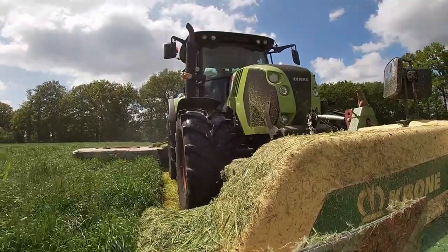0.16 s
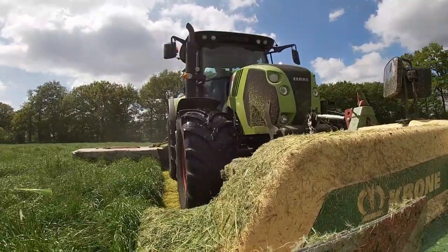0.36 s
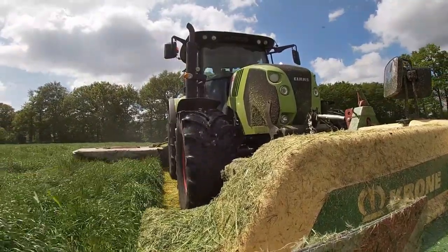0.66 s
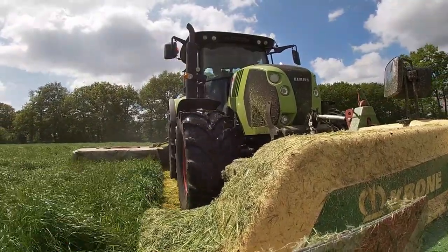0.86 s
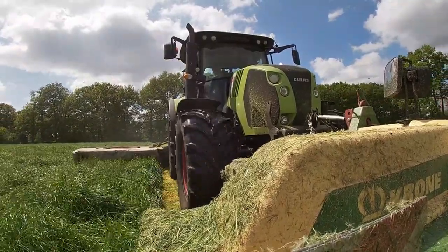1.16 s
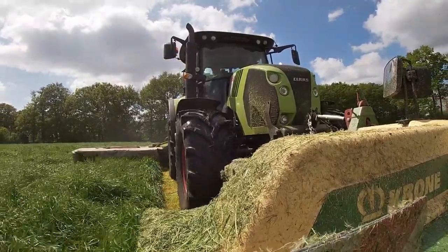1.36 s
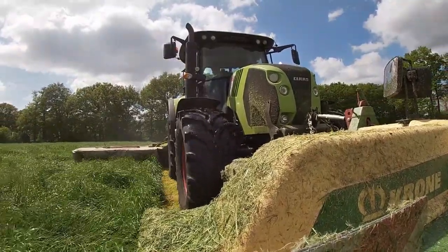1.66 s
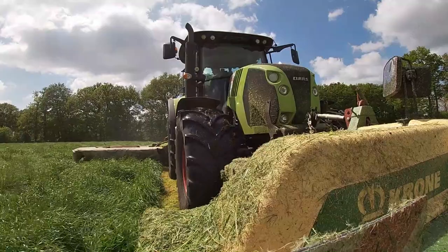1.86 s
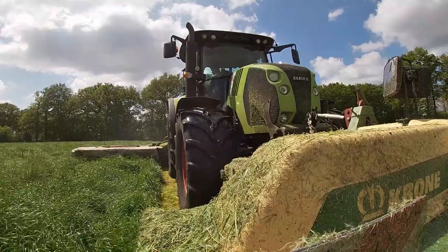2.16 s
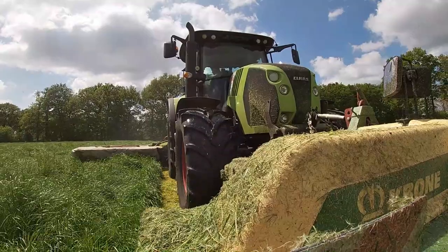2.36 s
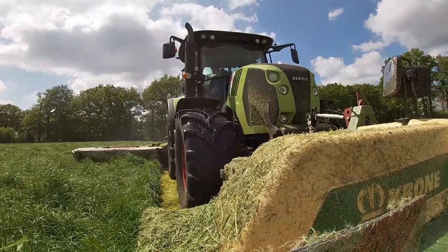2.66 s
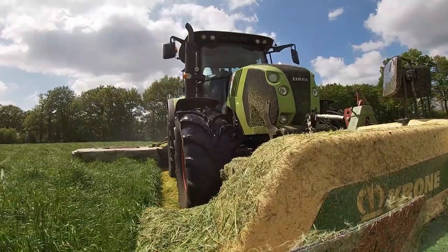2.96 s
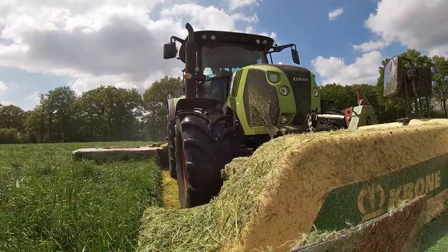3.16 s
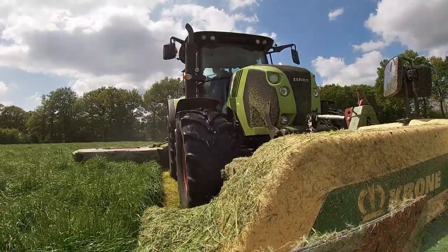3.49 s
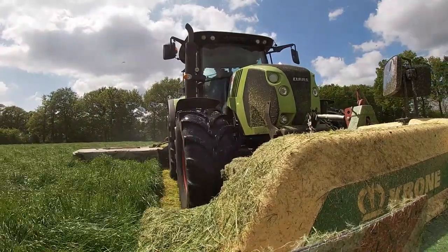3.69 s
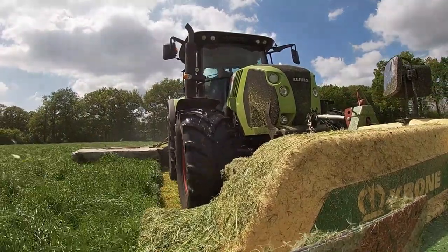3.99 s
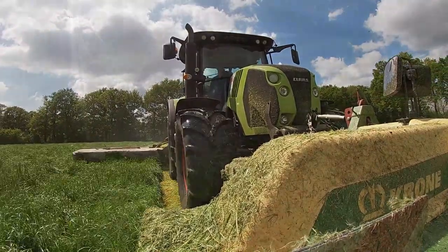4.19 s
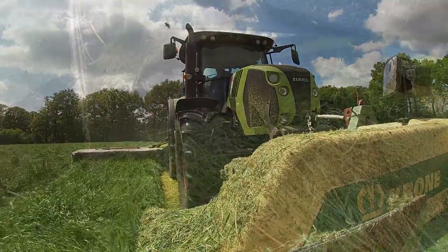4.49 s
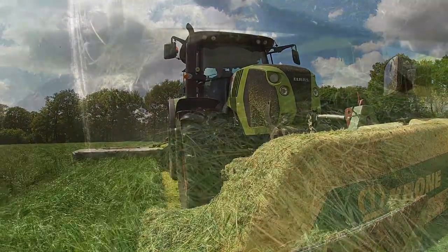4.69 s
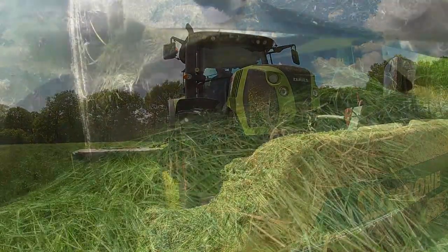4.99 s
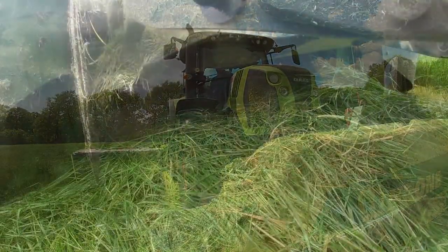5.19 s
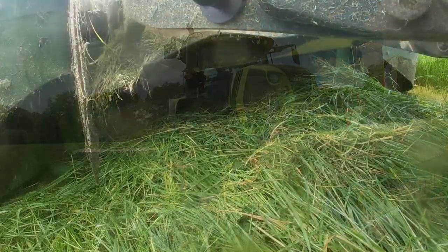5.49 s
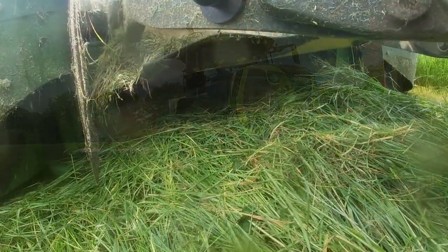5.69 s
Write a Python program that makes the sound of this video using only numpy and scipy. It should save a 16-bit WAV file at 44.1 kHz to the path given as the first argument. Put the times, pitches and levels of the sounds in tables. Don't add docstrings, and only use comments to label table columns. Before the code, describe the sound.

A loud rough mower hum near 104 hertz with a dense rush of torn grass, dissolving into slower rhythmic rustling sweeps of grass.

```python
import sys
import numpy as np
from scipy import signal
from scipy.fft import rfft, irfft, next_fast_len
from scipy.io import wavfile
from scipy.ndimage import uniform_filter1d

SR = 44100
rng = np.random.default_rng(int(sys.argv[2]) if len(sys.argv) > 2 else 0)


def level_to_linear(level):
    exponent = np.asarray(level, float) / 20
    return 10 ** exponent


def waveform_to_disk(signal):
    frames = np.transpose(np.atleast_2d(signal))
    scaled = np.clip(frames, -1, 1) * 32767
    samples = np.round(scaled).astype(np.int16)
    wavfile.write(sys.argv[1], SR, samples)


N = 257544
T = np.arange(N) / SR

# t/s, rate/Hz
BLADE_RATE = [(0.0, 104.41), (0.3, 104.25), (0.6, 103.79), (0.9, 103.62), (1.2, 104.07), (1.5, 103.66),
              (1.8, 104.21), (2.1, 104.11), (2.4, 104.28), (2.7, 103.81), (3.0, 103.96), (3.3, 104.3),
              (3.6, 104.86), (3.9, 104.32), (4.2, 104.43), (4.5, 103.45), (4.8, 103.41), (5.1, 104.44)]
DISC, REAR, GEAR, CRANK, FAN = 1 / 2, .48534, .48187, .32673, .60865
# multiple of its turning rate, level/dB
DISC_TONES = [(1, -44), (4, -34), (6, -39.5), (7, -44), (8, -37.5), (12, -41.5), (14, -41.5), (16, -48),
              (20, -42.5), (21, -46.5), (22, -46), (28, -54), (30, -48.5), (31, -48), (32, -49),
              (40, -51.5), (42, -45)]
REAR_TONES = [(6, -44), (8, -45)]
GEAR_TONES = [(6, -30), (12, -30), (13, -52), (18, -41), (19, -44), (24, -45.5), (25, -53), (27, -50.5),
              (29, -61), (30, -40), (38, -48), (76, -52)]
CRANK_TONES = [(1, -52), (4, -35.5)]
FAN_TONES = [(2, -37.5), (3, -34), (4, -38.5), (7, -45)]
# t/s, mower level/dB, rotor level/dB
DISSOLVE = [(4.1, -1, -41.5), (4.4, -2, -21), (4.8, -3.5, -12.5), (5.2, -8.5, -5), (5.5, -14, -3),
            (5.7, -17, -1.5), (5.84, -37, -0.5)]
# f/Hz, level/dB
ROAR = [(20, -15.5), (45, -13), (88, -3.5), (104, -7), (130, -4.5), (205, -10.5), (240, -11.5),
        (357, -14.5), (480, -14), (520, -13), (669, -15), (1300, -29.5), (1690, -52), (2860, -120)]
# f/Hz, level/dB
RUSH = [(530, -34), (900, -4.5), (995, -10), (1180, -5.5), (1300, -9.5), (1550, -6.5), (1780, -6),
        (2110, -6.5), (2290, -7.5), (3100, -7.5), (4110, -13), (5800, -14.5), (16000, -19)]
# f/Hz, share
LOAD_SHARE = [(4500, 1), (7500, 0)]
# f/Hz, width/Hz, level/dB
PANELS = [(222.7, 18, -37), (307, 25, -38), (513, 44, -37.5), (594.5, 21, -39), (1584, 180, -39.5),
          (2140, 100, -46.5), (3780, 45, -51.5), (4930, 90, -50.5)]
# f/Hz, level/dB
SWEEP = [(20, -14), (86, -2.5), (169, -2), (368, -15), (470, -2.5), (613, -11), (763, -4), (949, -11.5),
         (2830, -17.5), (4000, -26), (6000, -31), (9500, -29), (11000, -36), (16000, -37)]
# f/Hz, width/Hz, lift/dB
HOUSING = [(495, 84, 4), (750, 50, -1), (858, 34, 5.5), (1079, 71, 8), (1630, 46, 6), (1835, 50, 5),
           (2143, 45, 6), (2790, 55, 6), (3680, 40, 8)]
# strength/dB, fall time/share of a stroke
ARMS = [(1.2, 0.33), (-0.3, 0.3), (-.6, 0.22), (-.8, 0.22)]
# f/Hz, depth
STROKE_DEPTH = [(100, .15), (600, 0.2), (2000, 0.55), (4500, 1.05), (9000, 1.2)]
# f/Hz, share
REPEAT = [(100, .55), (900, .6), (2000, .55), (5000, .35)]
# f/Hz, level/dB
ROTOR_TONES = [(80.1, -28), (100.8, -39), (160.2, -42), (201.6, -29.5), (302.5, -48), (604.7, -38)]
# f/Hz, level/dB
MICROPHONE = [(6000, 0), (6400, -10), (7000, -19.5), (7500, -21.5), (9100, -18), (9700, -21.5),
              (11000, -21), (12000, -32), (13500, -33), (14300, -50)]
# t/s, change/dB, length/s
FRONT_SWELLS = [(.55, -5, .08), (.815, -8.5, 0.17), (1.05, -1.5, .3), (1.78, -3, 0.045), (2.15, -6, 0.11),
                (2.41, -7, .07), (2.75, 2.5, .2), (3.09, -8, 0.077), (3.2, 2, .1), (3.34, -9, .1),
                (3.62, 1.5, .15), (3.98, 3, .3), (4.21, -6, .12), (4.67, -3, .1), (5.1, -4, .35), (5.4, -5, .2)]
# t/s, change/dB, length/s
REAR_SWELLS = [(.33, 10, .12), (.52, 7, .08), (.68, 13, 0.081), (.82, 9, 0.11), (.98, 11, 0.14), (1.4, 8.5, .3),
               (1.76, 6, .08), (1.95, 9, .2), (2.17, 8.5, .2), (2.48, 9, .2), (2.86, 15, 0.16), (3.08, 7.5, 0.2),
               (3.65, 10, 0.46), (4.22, 7, 0.18), (4.54, 9, .1), (4.98, 13, 0.47)]
# t/s, change/dB
BUMPS = [(.06, 12), (.25, 16), (.36, 13.5), (.53, 19), (.62, 12), (.92, 15), (1.1, 12), (1.43, 8),
         (1.56, 18), (1.95, 15), (2.16, 16), (2.41, 12), (2.7, 10), (2.93, 5), (3.09, 11), (3.37, 14),
         (3.47, 12), (3.57, 13), (3.7, 9), (3.82, 14), (4.05, 7), (4.25, 14), (4.47, 13), (4.57, 12),
         (4.68, 17), (5.1, 17)]
# t/s, change/dB, length/s
STRAIN = [
    (1.01, 4, 0.22),
    (1.42, 5, .25),
    (1.61, -6, .08),
    (1.93, 1, .2),
    (2.2, -1.5, .3),
    (2.62, -2, .1),
    (2.78, 1.5, .2),
    (3.6, -4, 0.18),
    (4.7, -3.5, 0.81),
]
# t/s, change/dB, length/s
CLUMPS = [(.1, 0.5, .12), (.91, 2.5, 0.088), (1.07, 3, 0.2), (1.25, 1.5, 0.24), (1.62, 1.5, .25),
          (2.05, 3, 0.39), (2.21, 4, 0.12), (2.34, 2, 0.1), (2.55, 1.5, .3), (2.87, 1.5, .2),
          (3.1, 1, 0.22), (3.36, 3, 0.47), (3.87, 2, .2), (4.4, 0, 0.25)]
# t/s, change/dB, length/s
GUSTS = [
    (.05, 1.5, .2),
    (.98, 2, .4),
    (1.35, -1, .2),
    (2.2, -1.5, .12),
    (4.4, 1, .5),
]


def evened(x):
    return x / np.sqrt(np.mean(x ** 2) + 1e-20)


def read(points, hz):
    f, value = np.transpose(points)
    return np.interp(np.log(hz + 1), np.log(f + 1), value)


def curves(rows):
    s, *columns = np.transpose(rows)
    return [np.interp(T, s, column) for column in columns]


def swells(rows):
    return sum(db * np.exp(-2 * (2 * (T - s) / length) ** 2) for s, db, length in rows)


def colour(x, gain):
    size = next_fast_len(N)
    return irfft(rfft(x, size) * gain(np.fft.rfftfreq(size, 1 / SR)), size)[:N]


def noise_through(x, spectrum):
    return colour(x, lambda f: level_to_linear(read(spectrum, f)))


def bell(f, hz, width_hz):
    return 1 / (1 + (2 * (f - hz) / width_hz) ** 2)


def ringing(hz, width_hz):
    return evened(colour(rng.standard_normal(N), lambda f: bell(f, hz, width_hz)))


def drift(rate_hz):
    coarse = np.arange(0, N / SR, 1 / 200)
    rates = rate_hz * np.geomspace(1 / 10, 1, num=12)
    slow = sum(np.sin(2 * np.pi * (f * coarse + rng.random())) / np.sqrt(f) for f in rates)
    return np.interp(T, coarse, evened(slow))


def field(x, db):
    hz, s, z = signal.stft(x, SR, nperseg=256, noverlap=192)
    return signal.istft(z * level_to_linear(db(hz[:, None], s)), SR, nperseg=256, noverlap=192)[1][:N]


def tone(turns):
    return np.sqrt(2) * np.sin(2 * np.pi * (turns + rng.random()))


def shaft(turns, tones, waver_db, rate_hz):
    return sum(level_to_linear(db + waver_db * drift(rate_hz)) * tone(k * turns) for k, db in tones)


def roar():
    return level_to_linear(-21 + 0.26 * drift(9)) * evened(noise_through(rng.standard_normal(N), ROAR))


def rotor_strokes(rotor_hz):
    first_arm_s = 5.3
    rise = 0.15
    strokes = (T - first_arm_s) * 4 * rotor_hz + rise
    number, u = np.floor(strokes).astype(int), strokes % 1
    strength_db, fall = np.array(ARMS)[number % 4].T
    strength_db = strength_db + .45 * rng.standard_normal(400)[number]
    attack = np.minimum(u / rise, 1) ** 2
    decay = np.exp(-np.maximum(u - rise, 0) / fall)
    power = level_to_linear(2 * strength_db) * attack * decay
    return 10 * np.log10(.03 + uniform_filter1d(power, size=120))


def rotor():
    rotor_hz = 6.669
    one_turn = rng.standard_normal(round(SR / rotor_hz))
    same = colour(np.resize(one_turn, N), lambda f: np.clip(read(REPEAT, f), 0, 1))
    fresh = colour(rng.standard_normal(N), lambda f: np.sqrt(1 - np.clip(read(REPEAT, f), 0, 1) ** 2))

    def housing_db(f):
        return sum(db * bell(f, hz, width_hz) for hz, width_hz, db in HOUSING)
    grass = colour(same + fresh, lambda f: level_to_linear(read(SWEEP, f) + housing_db(f)))
    stroke_db = rotor_strokes(rotor_hz)
    stroke_db = stroke_db - stroke_db.mean()
    swept = field(grass, lambda hz, s: read(STROKE_DEPTH, hz) * np.interp(s, T, stroke_db))
    return level_to_linear(-19.5) * evened(swept) + shaft(T, ROTOR_TONES, 1.8, 2.5)


def panels():
    return sum(level_to_linear(db) * ringing(hz, width_hz) for hz, width_hz, db in PANELS)


def thrum(passes):
    start = rng.random()
    beat_start = -0.17
    fan = level_to_linear(-25.5) * np.sin(2 * np.pi * (FAN * passes + start))
    crank = level_to_linear(-31) * np.sin(2 * np.pi * (2 * CRANK * passes + start + beat_start))
    return np.sqrt(2) * (fan + crank)


def shafts(passes):
    discs = shaft(DISC * passes, DISC_TONES, 2.45, 9) + shaft(REAR * passes, REAR_TONES, 2.3, 8.2)
    gearbox = shaft(GEAR * passes, GEAR_TONES, 1.46, 9)
    tractor = shaft(CRANK * passes, CRANK_TONES, 0.65, 3) + shaft(FAN * passes, FAN_TONES, 1.9, 2.7)
    return discs + gearbox + tractor


def hood_boom():
    boom = ringing(159.0, 9)
    boom = boom / (0.25 + uniform_filter1d(abs(boom), size=900))
    bump_s = 0.11
    boom_db = -35.5 + swells([(s, db, bump_s) for s, db in BUMPS])
    return level_to_linear(boom_db) * evened(boom)


def cutting(passes):
    snap_strength = level_to_linear(2.2 * np.minimum(rng.exponential(size=N), 5))
    snap_happens = rng.random(N) < 3000 / SR
    snaps = snap_strength * snap_happens * rng.standard_normal(N)
    stems = rng.standard_normal(N) + 0.38 * evened(snaps)
    flicker = evened(uniform_filter1d(rng.standard_normal(N), size=700))
    pulsing = 1 + .09 * np.cos(2 * np.pi * passes) + .07 * np.cos(4 * np.pi * passes)
    load_db = swells(CLUMPS)
    air_db = .2 * load_db + .3 * drift(3.06) - .1 * T + swells(GUSTS)
    load_db, air_db = load_db - load_db.mean(), air_db - air_db.mean()

    def level_db(hz, s):
        share = read(LOAD_SHARE, hz)
        swell = share * np.interp(s, T, load_db) + (1 - share) * np.interp(s, T, air_db)
        patches = uniform_filter1d(rng.standard_normal(swell.shape), size=16, axis=1)
        patches = uniform_filter1d(patches, size=5, axis=0)
        return swell + 0.68 * evened(patches)
    rush = field(stems * pulsing * level_to_linear(0.61 * flicker), level_db)
    return level_to_linear(-27.5) * evened(noise_through(rush, RUSH))


def whine(passes):
    return level_to_linear(-25.7 + swells(STRAIN) + .8 * drift(6.9)) * tone(5 * passes)


def blade_hum(passes):
    cancel_s = 1.793
    beat = 3.15 * (T - cancel_s)
    front = level_to_linear(-15.7 + swells(FRONT_SWELLS)) * np.sin(2 * np.pi * passes)
    rear = level_to_linear(-28.5) * np.sin(2 * np.pi * (passes - beat))
    rear_hum = level_to_linear(-30.5 + swells(REAR_SWELLS) + 2 * np.cos(2 * np.pi * beat)) * tone(4 * REAR * passes)
    return np.sqrt(2) * (front - rear) + rear_hum


def scene():
    passes = np.cumsum(curves(BLADE_RATE)[0]) / SR
    mower_db, rotor_db = curves(DISSOLVE)
    machine = roar() + panels() + thrum(passes) + shafts(passes) + hood_boom()
    mower = machine + cutting(passes) + whine(passes) + blade_hum(passes)
    return (level_to_linear(rotor_db) * rotor() + level_to_linear(mower_db) * mower)[None]


def top_cut(x):
    return signal.sosfilt(signal.butter(12, 15000, fs=SR, output="sos"), x)


def record(dry):
    rounded = 1.257 * np.tanh(dry[0] / 1.144)
    heard = noise_through(rounded, MICROPHONE)
    return top_cut(heard[None])


dry = scene()
out = record(dry)
waveform_to_disk(out)
```